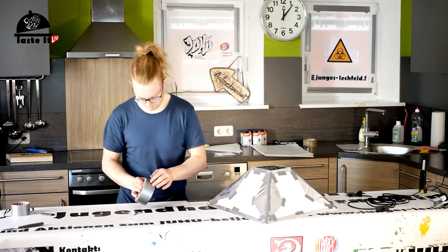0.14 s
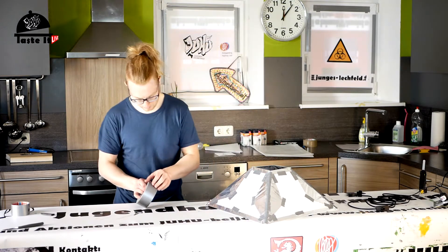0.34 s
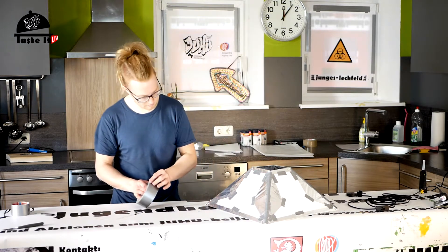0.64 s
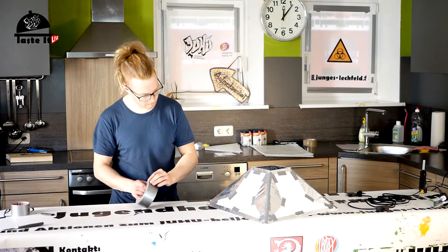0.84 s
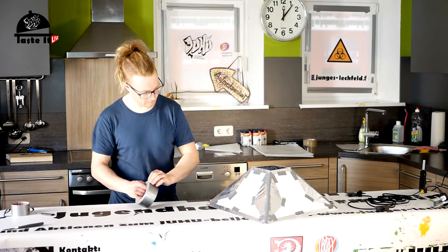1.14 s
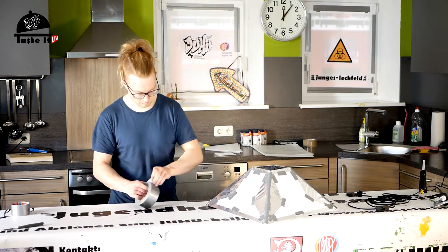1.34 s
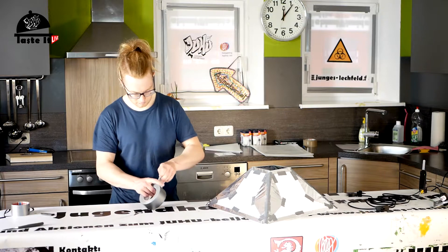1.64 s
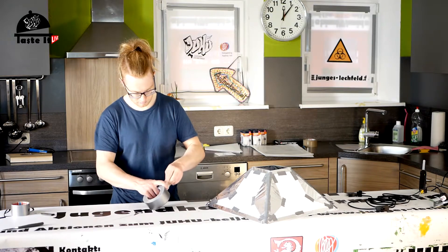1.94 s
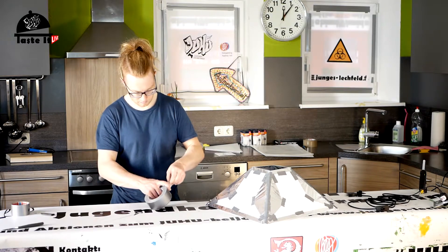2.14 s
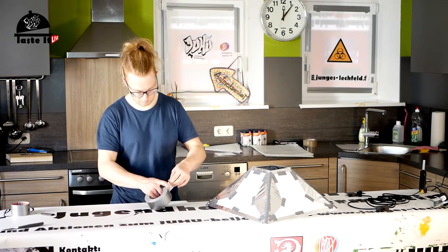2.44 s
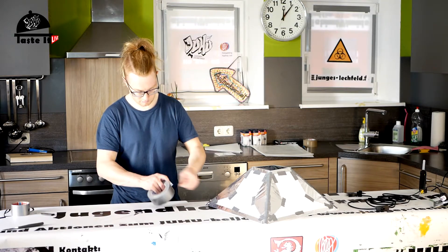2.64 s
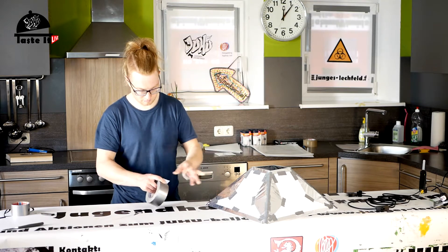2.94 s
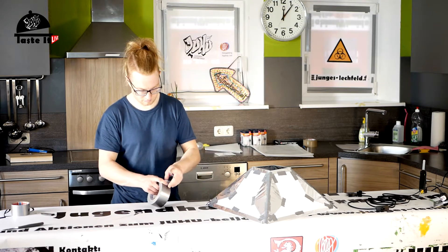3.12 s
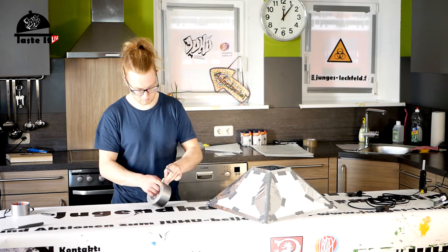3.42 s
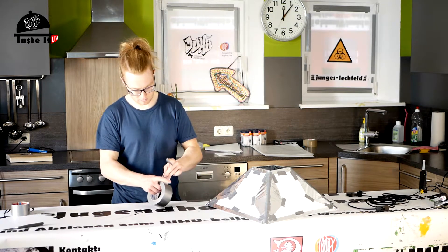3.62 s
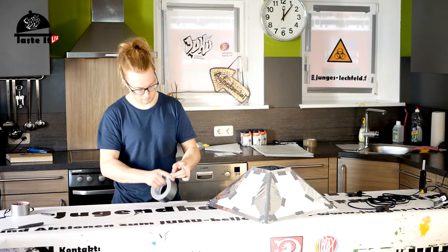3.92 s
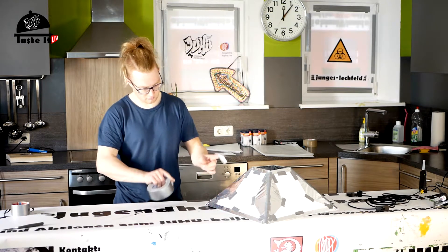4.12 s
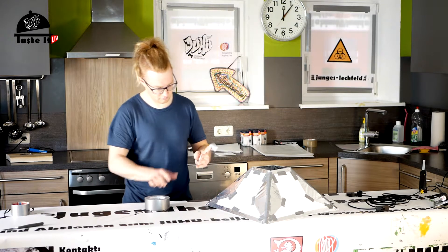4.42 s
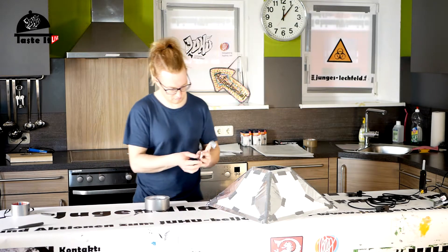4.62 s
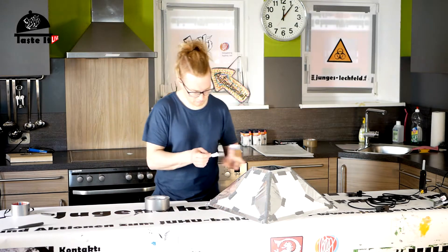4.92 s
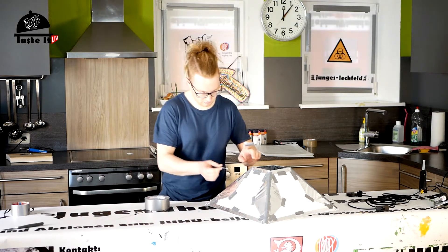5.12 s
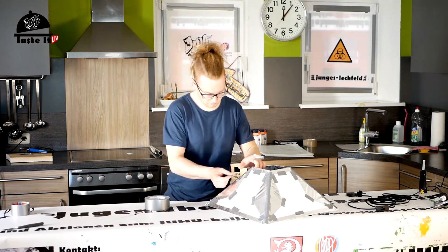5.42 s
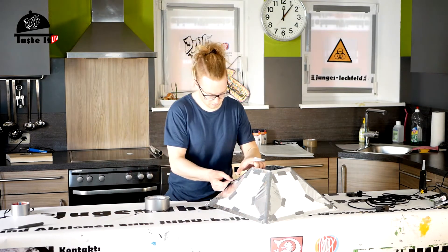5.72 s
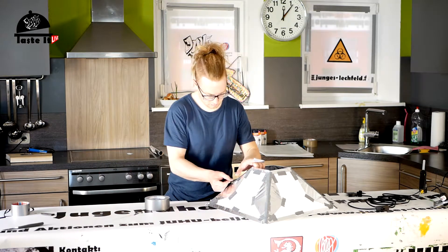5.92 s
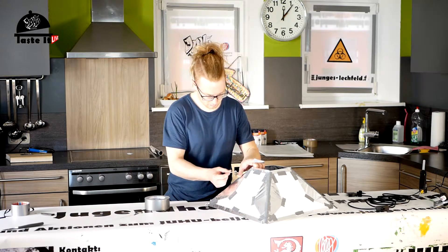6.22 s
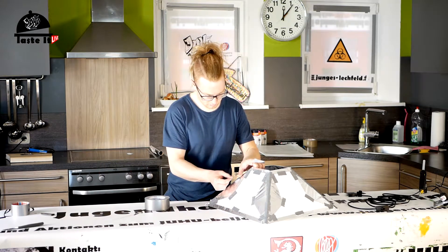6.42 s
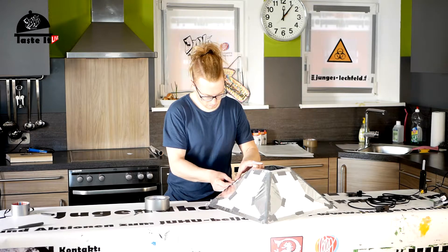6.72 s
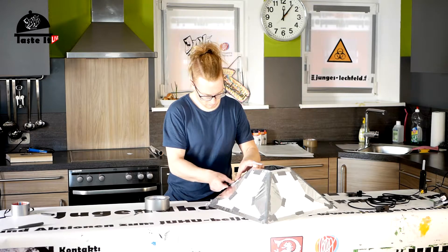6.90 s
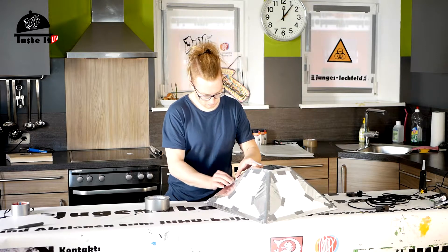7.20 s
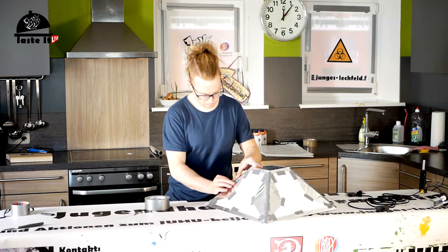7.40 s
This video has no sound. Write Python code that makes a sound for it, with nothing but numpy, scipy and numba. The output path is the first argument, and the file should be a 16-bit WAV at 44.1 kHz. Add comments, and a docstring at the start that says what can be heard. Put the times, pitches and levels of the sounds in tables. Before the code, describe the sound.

A few metres away in a hard-walled kitchen, duct tape is picked and peeled from its roll in short rasping rips with crisp snaps and brief fluttering twangs. The roll then drops on the table with a dull, woody knock and quick rocking taps. A last small crackle of tape follows, then quiet grainy finger rubbing and soft hollow cardboard bumps over a faint steady room floor.

```python
"""Duct tape in a kitchen

Duct tape is picked and pulled off its roll in short rips, a few metres from the microphones in a
hard-walled kitchen. Glue lets go in dense tiny slips and single snaps that the freed strip radiates.
The roll is dropped on the table and rocks to rest, its blows ringing the table top; fingers then rub the
piece onto a hollow cardboard shape, heard as grainy friction and soft bumps over a faint steady floor.
"""
import sys
import numpy as np
from scipy import signal
from scipy.fft import rfft, irfft
from scipy.io import wavfile
from scipy.ndimage import uniform_filter1d
from numba import njit

SR = 44100
rng = np.random.default_rng(int(sys.argv[2]) if len(sys.argv) > 2 else 0)


def store_pcm(level_fs):
    """Save levels as 16-bit WAV."""
    pcm = np.round(np.clip(level_fs, -1, 1) * 32767).astype(np.int16)
    wavfile.write(sys.argv[1], SR, np.atleast_2d(pcm).T)


N = 333396
T = np.arange(N) / SR  # seconds

# All levels are relative, ahead of the body, room and microphone filters.
# steady pulls on the tape: start_s, duration_s, level_db, swell_db (over the pull),
# start_cm, end_cm (free strip)
PULLS = [ (1.262, 0.096, -39, 0.5, 4, 31), (1.441, 0.15, -37, 5.5, 19, 18.7),
         (1.995, 0.12, -42, -9, 15, 9.3), (2.2, 0.033, -36.5, -4, 5.4, 16),
         (2.586, 0.067, -54.5, 15, 5.5, 4), (2.647, 0.069, -29, -3, 5.4, 8),
         (2.855, 0.073, -44, 16, 3.7, 2.8), (3.51, 0.054, -35, 13, 3.7, 8.5),
         (3.557, .13, -29.5, -9, 7.9, 23), (3.847, 0.11, -37, 8.5, 4.4, 5),
         (3.977, .1, -33.5, -17, 3.5, 9.8), (4.151, 0.3, -54.5, -19.5, 7.6, 5.9),
         (4.849, 0.063, -48, 16, 2.4, 8), (4.927, .045, -34, -5, 10.2, 13)]
# single snaps of glue and film: start_s, strength_db, strip_cm
SNAPS = [ (1.229, -31, 3.2), (1.263, -18.5, 4.4), (1.297, -10.5, 10), (1.333, -9.5, 16), (1.403, -8, 6.4),
         (1.429, -7, 9.8), (1.461, -4, 13.4), (1.504, -3, 14.5), (1.541, -4, 14.4), (1.766, -21, 8.2),
         (1.993, -4.5, 31), (2.069, -10, 3.7), (2.621, -17, 7), (2.651, -3.5, 5.7), (2.908, -11, 5.4),
         (2.948, -11.5, 3.34), (3.537, -7, 4), (3.558, -1, 9.1), (3.879, -7.5, 6.1), (3.908, -6, 3.7),
         (3.979, -5.5, 2.4), (4.875, -11, 5.3), (4.927, -8, 7), (6.112, -19.5, 5.2), (6.138, -15.5, 9),
         (6.940, -9, 4.2)]
# twangs of the strip pulled taut: start_s, pitch_hz, level_db
TWANGS = [(1.325, 1099, -31.5), (1.330, 448.5, -39), (1.539, 452, -33.5), (2.07, 572.5, -29),
          (2.069, 2843, -28), (2.653, 2473, -30.5), (2.908, 1381, -30.5), (3.588, 1514, -22.5),
          (6.938, 5110, -39)]
TWANG_T60_S = .13
# colour of the cloth-backed film: frequency_hz, level_db
TAPE_COLOUR = [(40, -51), (150, -2), (350, 1.5), (600, 3.5), (850, 0.5), (1300, 0), (2500, 1), (4700, 0.5),
               (6300, -7), (8000, -13.5), (10500, -12.5), (12500, -28), (14500, -74)]
STRIP_WAVE_CM_HZ = 15700  # strip length times its lowest strong resonance
# the dying rasp behind every snap: level against the snap, fall and length
RASP_DB, RASP_FALL_DB_PER_S, RASP_S = -28.5, 388, .045
# a short strip is bright and a long one dull: treble at SHORT_CM, and its loss per doubling of length
SHORT_CM, PEEL_TREBLE_DB, SNAP_TREBLE_DB, DULLING_DB_PER_OCTAVE = 4.48, 2, 8, 6

# fingers sliding on the roll, then on tape and cardboard:
# start_s, duration_s, level_db, swell_db (over the stroke), treble_db
STROKES = [(3.05, .25, -62, 4, -11), (3.369, 0.11, -59, -3, 8), (4.544, 1.33, -64, -3, -17),
           (5.401, 0.081, -73.5, 0, 10.5), (5.922, 0.87, -64.5, -6.5, -5.5),
           (6.077, 0.078, -55.5, 16, 10.5), (6.614, 0.45, -60, 5, 10.5), (7.099, 0.2, -57, 6.5, 6.5),
           (7.256, 0.47, -52, 2, 4)]
STROKE_ATTACK_S, STROKE_RELEASE_S = 0.0061, 0.02
# colour of sliding skin: frequency_hz, level_db
SKIN_COLOUR = [(150, -2.5), (500, 8.5), (1500, 0.5), (3000, -2), (5000, -3.5), (8000, -9), (11000, -7.5),
               (13000, -29), (15000, -36)]
# the hand brushes over the smooth side of the roll: loudest_s, half_width_s, level_db, centre_hz
BRUSHES = [(.13, 0.085, -57.5, 2270), (3.385, 0.057, -45.5, 3170)]

# the roll lands and rocks on the table: start_s, strength_db
ROLL_BLOWS = [(4.295, 3), (4.310, 9.5), (4.333, 4.5), (4.349, -4), (4.368, -10), (4.420, -7.5),
              (4.528, -29), (4.667, -24.5)]
# colour of the roll's thud: frequency_hz, level_db
THUD_COLOUR = [(40, -18), (80, -47.5), (150, -4), (280, 1.5), (480, -0.5), (650, -2), (900, -9.5),
               (1200, -22), (2000, -27.5), (4500, -40), (8000, -76)]
# table top modes: pitch_hz, level_db, t60_s
TABLE_MODES = [(187.6, -45.5, 0.51), (244, -56.5, 0.66), (256, -64, 0.34), (297, -29, 0.49),
               (425, -30, 0.37), (498, -29, 0.23), (482, -55, 0.32), (579, -38.5, 0.3)]
# fingers bump the cardboard: start_s, strength_db
CARD_BUMPS = [(6.139, -26.5), (6.940, -11.5), (7.317, -7.5), (7.345, -21), (7.372, -13), (7.440, -15),
              (7.475, -15), (7.542, -17.5)]
# colour of the hollow cardboard: frequency_hz, level_db
CARD_COLOUR = [(50, -50), (100, -16), (160, 1), (320, 8.5), (600, 4.5), (900, 2), (1300, -7), (2500, -10),
               (6000, -79), (12000, -78)]

# first reflection, off the ceiling: delay_s, level_db
ECHOES = [(.0082, -8)]
# decay of the kitchen: frequency_hz, t60_s
KITCHEN_T60 = [(125, 0.8), (400, 0.59), (1200, 0.71), (3000, 0.6), (6000, 0.51), (12000, 0.32)]
# side against mid of diffuse sound, narrow in the bass and nearly mono in the high treble:
# frequency_hz, level_db
WIDTH = [(60, -8), (200, -10), (360, -10), (650, -9), (1200, -6), (2200, -8.5), (4600, -13), (7000, -66),
         (12000, -47)]
# spectrum of the steady floor, mid: frequency_hz, level_db (per Hz)
AIR_MID = [(25, 5), (50, -12), (80, -6.5), (140, -1), (280, 0.5), (630, -2), (900, -4), (2000, -11),
           (4000, -16.5), (6300, -24.5), (8000, -32.5), (10500, -32), (14500, -43)]
# spectrum of the steady floor with its wide bass, side: frequency_hz, level_db (per Hz)
AIR_SIDE = [(25, -37), (50, -7), (100, -2.5), (180, 3.5), (360, 3), (650, -1.5), (1200, -5.5),
            (2200, -16.5), (4400, -29), (7000, -43), (14000, -47.5)]
AIR_MID_DB, AIR_SIDE_DB = -62.5, -57
TOP_HZ = 14500  # upper edge of the pickup


def tape():
    """Slips and snaps take the colour of the film, too small to radiate deep bass; twangs are added."""
    peeling = through(pulls() + snaps(), body(TAPE_COLOUR))
    return peeling + highpass(twangs(), np.full(N, 250.), np.sqrt(2))


def pulls():
    """The hand peels on, harder or softer, while the length of the free strip changes."""
    out = np.zeros(N)
    for start_s, duration_s, level_db, swell_db, start_cm, end_cm in PULLS:
        progress = np.linspace(0, 1, int(duration_s * SR))
        pull_db = level_db + swell_db * (progress - .5)
        strip_cm = start_cm + (end_cm - start_cm) * progress
        add(out, start_s, peel(pull_db, strip_cm))
    return out


def peel(db, cm, slip_hz=170, stick_db=-19, jitter=.35, uneven_db=3, cracks_per_s=90, crack_db=21):
    """Glue threads break in quick uneven bursts; now and then a thick one cracks."""
    n = len(db)
    cycle = np.cumsum(slip_hz * np.exp(jitter * wander(n, size=150))) / SR
    # the peel front jumps, sticks and jumps again; some patches hold harder than others
    grip_db = stick_db * (cycle % 1) + uneven_db * wander(n, size=220)
    threads = slips(n, rate=9000, scatter_db=5.5) * undb(grip_db)
    force = unit(wrinkles(threads))
    cracks = undb(crack_db) * (rng.random(n) < cracks_per_s / SR)
    return strip(unit(force + cracks) * undb(db), cm, PEEL_TREBLE_DB - dulling(cm))


def slips(n, rate, scatter_db):
    """Tiny stick-slip releases at random moments (rate per second), most small and a few large."""
    when = rng.random(n)
    size = np.clip(rng.standard_normal(n), -2, 2)
    sign = rng.choice([-1, 1], n)
    return unit((when < rate / SR) * undb(scatter_db * size) * sign + 1e-9)


def wrinkles(force, ripple_db=4.0, count=56):
    """Every patch of film is creased differently and favours its own narrow bands."""
    bands_hz = np.linspace(150, 14000, count)
    ripple = ripple_db * rng.standard_normal(count)
    return through(force, body(np.c_[bands_hz, ripple], size=1024))


def strip(force, cm, treble_db, damping=0.92, roll_db=-22):
    """The free strip radiates above its resonance, lower when longer; the roll adds a little of the lows."""
    resonance_hz = np.clip(STRIP_WAVE_CM_HZ / cm, 100, SR / 5)
    lows = signal.lfilter(*signal.butter(1, 1500, fs=SR), force)
    radiated = highpass(force, resonance_hz, damping) - undb(roll_db) * lows
    return brighten(radiated, treble_db)


def dulling(cm):
    """Treble that a free strip of this length loses against one of SHORT_CM, in dB."""
    return DULLING_DB_PER_OCTAVE * np.log2(cm / SHORT_CM)


def snaps(decay_s=0.00072):
    """A whole patch of glue lets go within about a millisecond, and the peel runs on briefly behind it."""
    out = np.zeros(N)
    t = T[:int(RASP_S * SR)]
    for start_s, strength_db, strip_cm in SNAPS:
        length_cm = np.full(len(t), float(strip_cm))
        # every sample has a random sign under the dying envelope
        force = rng.choice([-1, 1], len(t)) * np.exp(-t / decay_s)
        force = undb(strength_db) * force / np.linalg.norm(force)
        add(out, start_s, strip(force, length_cm, SNAP_TREBLE_DB - dulling(strip_cm)))
        rasp_db = strength_db + RASP_DB - RASP_FALL_DB_PER_S * t
        add(out, start_s, peel(rasp_db, length_cm))
    return out


def twangs(width=0.179):
    """The taut strip flutters on around one resonance, blurred by its changing tension."""
    out = np.zeros(N)
    t = T[:SR // 4]
    for start_s, pitch_hz, level_db in TWANGS:
        tension = 1 + width * wander(len(t), size=int(2 * SR / pitch_hz))
        phase = 2 * np.pi * np.cumsum(pitch_hz * tension) / SR
        decay = np.exp(-np.log(1000) * t / TWANG_T60_S)
        add(out, start_s, undb(level_db) * decay * np.sin(phase))
    return out


def fingers(catch_db=1.7):
    """Skin slides with a fine grainy hiss of its own treble per stroke, catching unevenly along the way."""
    grain = through(slips(N, rate=4000, scatter_db=8.5), body(SKIN_COLOUR))
    grain = unit(grain * undb(catch_db * wander(N, size=1500)))
    out = np.zeros(N)
    for start_s, duration_s, level_db, swell_db, treble_db in STROKES:
        t = T[:int((duration_s + STROKE_RELEASE_S) * SR)]
        rise, release = t / STROKE_ATTACK_S, (t[-1] - t) / STROKE_RELEASE_S
        contact = np.clip(np.minimum(rise, release), 0, 1)
        patch = np.roll(grain, -int(start_s * SR))[:len(t)]
        stroke_db = level_db + swell_db * (t / duration_s - .5)
        add(out, start_s, contact * undb(stroke_db) * brighten(patch, treble_db, edge_hz=5250))
    return out


def brushes(ratio=1.54):
    """The hand on the roll's side makes a soft grainy swish, a band of tiny slips that swells and fades."""
    out = np.zeros(N)
    for loudest_s, half_width_s, level_db, centre_hz in BRUSHES:
        edges_hz = [centre_hz / ratio, centre_hz * ratio]
        band = signal.butter(2, edges_hz, "bandpass", fs=SR, output="sos")
        swish = unit(signal.sosfilt(band, slips(N, rate=5000, scatter_db=4.5)))
        swell = np.exp(-((T - loudest_s) / half_width_s) ** 2 / 2)
        out += undb(level_db) * swell * swish
    return out


def blows(table):
    """One single-sample push for each blow of the roll or bump of the fingers."""
    force = np.zeros(N)
    for start_s, strength_db in table:
        add(force, start_s, undb([strength_db]))
    return force


def table_ring(force):
    """The table top hums on in its low modes; the soft edge of the roll drives only these."""
    t = T[:SR]
    soft_edge = signal.butter(2, [140, 800], "bandpass", fs=SR, output="sos")
    push = signal.sosfilt(soft_edge, force)
    ring = np.zeros(SR)
    for pitch_hz, level_db, t60_s in TABLE_MODES:
        ring += undb(level_db - 60 * t / t60_s) * np.sin(2 * np.pi * pitch_hz * t)
    return through(push, ring)


def kitchen(x, direct_db=-3.5, wet_db=-2, turn_hz=7, count=4):
    """Direct sound, the ceiling reflection and the diffuse ring, as mid and side."""
    early = np.zeros(SR // 20)
    early[0] = 1
    for delay_s, level_db in ECHOES:
        add(early, delay_s, undb([level_db]))
    mid, side = undb(direct_db) * through(x, early), 0
    # the moving hands and tape aim the sound along different paths round the room, here in a steady cycle
    offsets = np.pi * np.arange(count)[:, None] / count
    aims = np.cos(2 * np.pi * turn_hz * T - offsets) ** 4
    for aim in aims / np.linalg.norm(aims, axis=0):
        mid = mid + undb(wet_db) * through(x * aim, tail())
        side = side + undb(wet_db) * through(x * aim, spread(tail()))
    return mid, side


def tail(count=16, build_s=0.002):
    """Diffuse ring of the kitchen: noise that builds up quickly and dies band by band."""
    t, f = T[:SR], np.arange(SR // 2 + 1)  # one second, so the bins are 1 Hz apart
    noise = rfft(rng.standard_normal(SR))
    edges_hz = np.geomspace(30, SR / 2, count + 1)
    out = np.zeros(SR)
    for low_hz, high_hz in zip(edges_hz, edges_hz[1:]):
        band = irfft(noise * (f >= low_hz) * (f < high_hz))
        t60_s = along(np.sqrt(low_hz * high_hz), KITCHEN_T60)
        out += band * np.exp(-np.log(1000) * t / t60_s)
    out = out * (1 - np.exp(-(t / build_s) ** 2))
    return out / np.linalg.norm(out)


def spread(diffuse):
    """Side signal of diffuse sound, set band by band by WIDTH."""
    size = 2 * len(diffuse)
    gain = undb(along(np.fft.rfftfreq(size, 1 / SR), WIDTH))
    return irfft(rfft(diffuse, size) * gain)[:len(diffuse)]


def air(spectrum, db):
    """Steady faint noise of room and microphones."""
    return undb(db) * unit(through(rng.standard_normal(N), body(spectrum, size=8192)))


def undb(db):
    """Decibels to gain."""
    return 10 ** (np.asarray(db) / 20)


def unit(x):
    """Scale to rms 1."""
    return x / np.sqrt(np.mean(x ** 2))


def along(hz, points):
    """Read (frequency_hz, value) points on a log-frequency axis."""
    f, value = np.transpose(points)
    return np.interp(np.log(hz + 1), np.log(f), value)


def add(track, s, x):
    """Mix x into the track at time s."""
    i = max(int(s * SR), 0)
    track[i:i + len(x)] += x[:max(N - i, 0)]


def through(x, response):
    """Pass a sound through an impulse response."""
    return signal.fftconvolve(x, response)[:len(x)]


def body(points, size=2048):
    """Causal (minimum-phase) impulse response of unit energy, shaped like the given spectrum."""
    cepstrum = irfft(np.log(undb(along(np.fft.rfftfreq(size, 1 / SR), points))))
    # fold the cepstrum forward in time
    cepstrum[1:size // 2] *= 2
    cepstrum[size // 2 + 1:] = 0
    response = irfft(np.exp(rfft(cepstrum)))
    return response / np.linalg.norm(response)


def brighten(x, db, edge_hz=7000):
    """Raise or lower the treble."""
    low = signal.lfilter(*signal.butter(1, edge_hz, fs=SR), x)
    return low + undb(db) * (x - low)


@njit
def highpass(x, hz, damping):
    """Resonant state-variable high-pass whose edge may move sample by sample."""
    y = np.empty(len(x))
    band_state, low_state = 0., 0.
    for i in range(len(x)):
        g = np.tan(np.pi * hz[i] / SR)
        band = (band_state + g * (x[i] - low_state)) / (1 + g * (g + damping))
        low = low_state + g * band
        band_state = 2 * band - band_state
        low_state = 2 * low - low_state
        y[i] = x[i] - damping * band - low
    return y


def wander(n, size):
    """Smoothed noise of rms 1, averaged over size samples."""
    return unit(uniform_filter1d(rng.standard_normal(n), size=size))


def scene():
    """Tape, hands, roll and cardboard sound in the kitchen; the table hum joins dry in the middle."""
    landing = blows(ROLL_BLOWS)
    thud = undb(-3) * through(landing, body(THUD_COLOUR))
    cardboard = through(blows(CARD_BUMPS), body(CARD_COLOUR))
    mid, side = kitchen(tape() + fingers() + brushes() + thud + cardboard)
    mid = mid + undb(-3.0) * table_ring(landing) + air(AIR_MID, AIR_MID_DB)
    side = side + air(AIR_SIDE, AIR_SIDE_DB)
    return np.array([mid + side, mid - side])  # left, right


def record(dry):
    """The microphone pickup thins the deep bass and cuts the top."""
    thin = signal.sosfilt(signal.butter(2, 55, "highpass", fs=SR, output="sos"), dry)
    return signal.sosfilt(signal.ellip(8, .2, 70, TOP_HZ, fs=SR, output="sos"), thin)


dry = scene()
out = record(dry)
store_pcm(out)
```